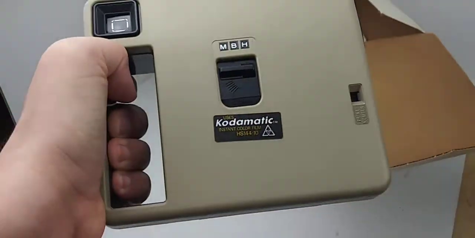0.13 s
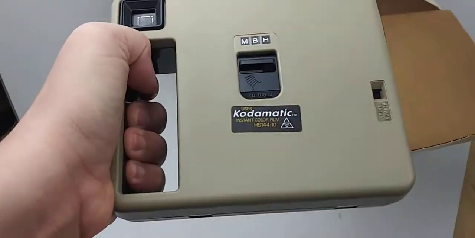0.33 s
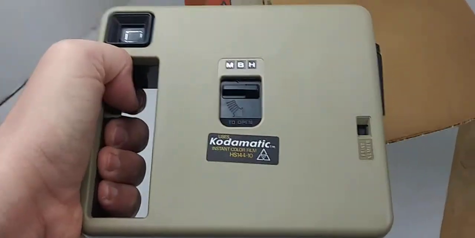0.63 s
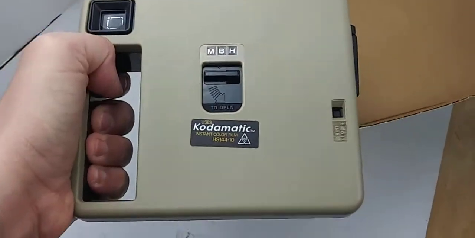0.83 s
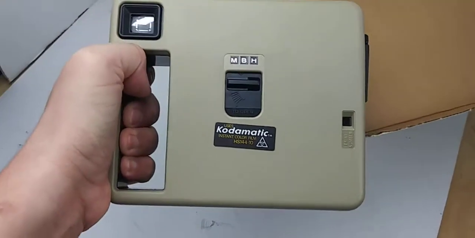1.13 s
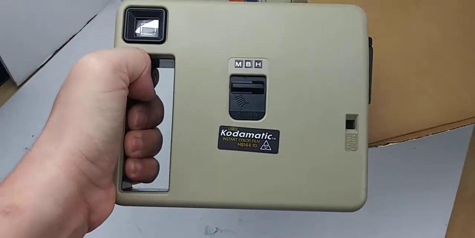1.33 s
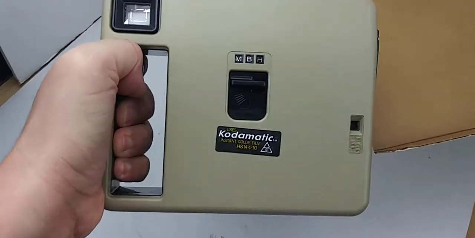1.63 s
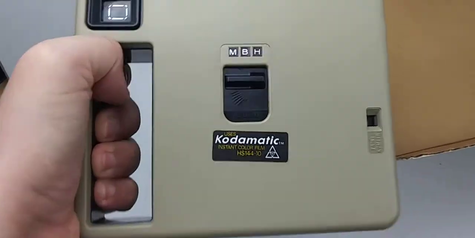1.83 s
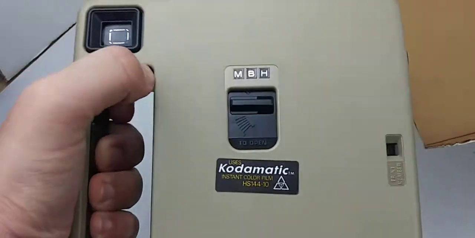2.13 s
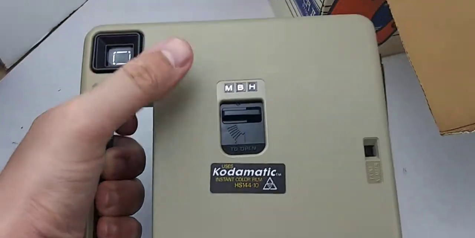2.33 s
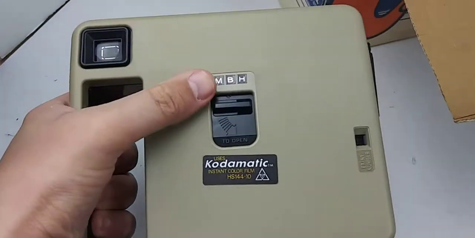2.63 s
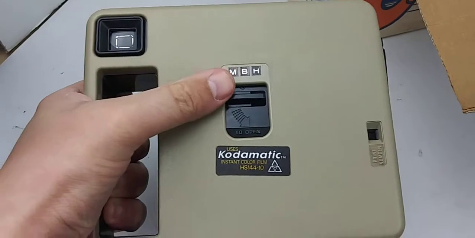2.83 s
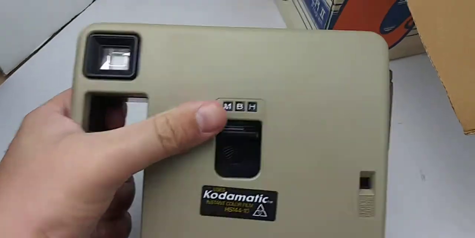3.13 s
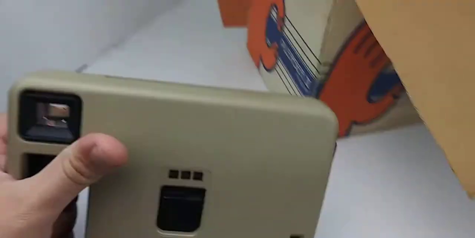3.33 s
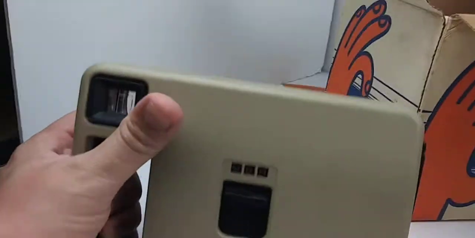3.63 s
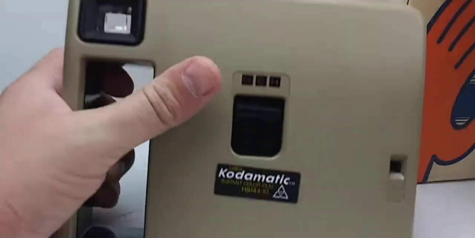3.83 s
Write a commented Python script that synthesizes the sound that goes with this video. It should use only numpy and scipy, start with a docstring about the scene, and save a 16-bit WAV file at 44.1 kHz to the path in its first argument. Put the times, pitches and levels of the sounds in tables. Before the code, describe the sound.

A hand handles a hollow plastic camera with light taps, rattles and a scraping slide.

```python
"""Handling a plastic camera

A hand shifts its grip on a hollow plastic camera close to the microphone in a quiet room.
Finger taps and rattling loose parts ring the shell; skin rubs, a finger squeaks, a catch snaps.
The camera bumps the table and slides with a gritty rush. A low hum wavers far away."""
import sys
import numpy as np
from scipy import signal
from scipy.fft import rfft, irfft
from scipy.io import wavfile
from scipy.ndimage import uniform_filter1d

SR = 44100
rng = np.random.default_rng(int(sys.argv[2]) if len(sys.argv) > 2 else 0)


def put_to_file(sound):
    """Save the sound as 16-bit audio at rate SR, in the file named by the first command-line argument."""
    columns = np.atleast_2d(sound).T  # one column per channel
    safe = np.clip(columns, -1, 1)
    whole_steps = np.round(safe * 32767)
    wavfile.write(sys.argv[1], SR, whole_steps.astype(np.int16))


N = 176400

# room hiss spectrum (frequency [Hz], density [dB])
AIR_SPECTRUM = [(25, -51), (61, -5.5), (107, -12.5), (228, -5), (571, -11.5), (856, -15), (1090, -16.5),
                (2080, -17), (3210, -20), (15800, -21.5)]
# room hiss, with brief dips (time [s], level [dB])
AIR_LEVELS = [(0, -63.5), (1.04, -65.5), (1.06, -78), (1.08, -66.5), (1.33, -68), (1.35, -77), (1.37, -64),
              (1.41, -69), (1.43, -80), (1.48, -75), (1.5, -68), (1.72, -66), (1.85, -64.5), (4, -61)]
WHISTLE_HZ, WHISTLE_START_DB = 3210, -80
# distant hum (time [s], pitch [Hz], level [dB])
HUM_TRACK = [(0, 98.2, -74.5), (.3, 101.1, -70), (.7, 105, -63.5), (.95, 103, -68.5), (1.05, 95, -79),
             (1.15, 91.7, -67), (1.35, 93.2, -75.5), (1.44, 91.7, -86), (1.55, 97.3, -72),
             (1.85, 95, -74.5), (2.2, 104.3, -68.5), (2.5, 100.9, -67.5), (2.75, 86.5, -68.5),
             (3.0, 79.7, -68), (3.25, 87, -69), (3.4, 90.1, -70), (4, 86.9, -72.5)]
HUM_OCTAVE_DB, HUM_WAVER_DB, HUM_WAVER_HZ = -19, 3, 4

# bumps through the table (time [s], level [dB], pitch [Hz], hard edge [dB], after-ring [dB])
TABLE_BUMPS = [(0.06, -37.5, 163, -17, -33), (0.333, -45, 200, -18, -16), (0.658, -41, 125, -17, -30),
               (0.966, -47.5, 203, -21, -13.5), (1.515, -41.5, 192, -14, -23),
               (1.604, -44.5, 268, -10, -10.5), (3.055, -30.5, 199.3, -5, -35), (3.264, -42.5, 266, -1, -9),
               (3.391, -37.5, 128, -4, -36), (3.6852, -10.5, 208, -17, -20), (3.9, -55, 267, -14, 15.5),
               (3.949, -49.5, 274, -19.5, 15)]
BUMP_WIDTH_CYCLES, BUMP_RING_T60_S, BUMP_EDGE_HZ = 0.23, 0.12, 910

# shell modes (frequency [Hz], level [dB], T60 [s])
SHELL_MODES = [(203, 8, 0.036), (261, 9.5, 0.093), (319, 15, 0.028), (429.4, 8, 0.09), (643, 3.5, 0.027),
               (947, -1.5, 0.047), (1272, 10, 0.009), (1647, 5, 0.021), (2050, 16.5, 0.0042),
               (2550, 19.5, 0.0027), (3640, 22, .006), (4330, 20, .006), (4900, 27, 0.00099),
               (6530, 25, 0.0018), (7150, 17, 0.006), (10200, 13, 0.0057)]
GRIP_DETUNE, TREBLE_MAX_T60_S = 0.05, 0.005  # the hand shifts the modes and damps the high ones
COLOUR_WIDTH_OCT, COLOUR_FLOOR_DB = 0.65, -10.5
PANEL_DB, PANEL_T60_S = 9, 0.05
# taps and rattles (time [s], level [dB], colour centre [Hz], bass [dB], treble [dB], chatter T60 [s])
SHELL_TAPS = [(0.226, -44, 1980, -33, -2, 0.054), (0.4, -38.5, 1266, -19.5, -48, 0.071),
              (0.429, -51.5, 4300, -14, 12, 0.14), (0.565, -47.5, 910, -7.5, -35, 0.06),
              (1.158, -52, 2150, -25, 13, 0.069), (1.361, -51, 1220, -3, -15, 0.08),
              (1.533, -51, 1160, 0, 8, 0.067), (1.568, -49, 1654, -2, -31, 0.086),
              (1.938, -37.5, 1516, -37, -17, 0.12), (2.061, -40, 2090, -14, -34, 0.14),
              (2.071, -35.5, 4470, -20, 11.5, 0.14), (2.163, -29.5, 1320, -17.5, -13, 0.051),
              (2.39, -41.5, 1647, -14, -3, 0.063), (2.514, -48, 1647, -15, -6, 0.18),
              (2.57, -30.5, 1320, -15, -10, 0.11), (2.626, -36, 4330, -10, 0.5, 0.1),
              (2.646, -29.5, 1326, -19.5, -19, 0.075), (2.716, -37, 1687, -8.5, -2.5, 0.11),
              (2.778, -38.5, 2100, -8, -8, 0.079), (2.838, -41.5, 1637, -13, -7, 0.08),
              (2.909, -32.5, 958, -13.5, -8.5, 0.089), (3.112, -36.5, 1273, -48, -9, 0.063),
              (3.148, -36.5, 4380, -12, 5, 0.075), (3.424, -31, 4330, -19, -2, 0.051),
              (3.452, -23, 2290, -5, -18, 0.037), (3.4705, -17, 3240, -11.5, -2, 0.048),
              (3.482, -16.5, 2630, -13, -5.5, 0.073), (3.511, -19.5, 1130, -8.5, -9, 0.11),
              (3.5975, -21.5, 3040, -2.5, -3, 0.043), (3.633, -29, 1130, -13, -30, 0.046),
              (3.683, -24, 1000, -2, 1, 0.069), (3.707, -23, 1200, -4, -12, 0.028),
              (3.946, -29.5, 1272, -28, -15, 0.086)]
CHATTER_PER_S, CHATTER_RISE_S, TREBLE_T60_RATIO = 1800, 0.0012, 0.87
FIRST_CLICK_DB, TAP_CREST_DB = 2.5, 10

# skin and shell rubbing (time [s], body level [dB], treble re body [dB])
RUB_LEVELS = [(0.4, -82, 10), (0.47, -67.5, -1), (0.62, -67.5, 1.5), (0.8, -76, 5), (0.95, -94, 2),
              (1.75, -83, 8.5), (1.899, -73, 10.5), (2.0, -68.5, 3.5), (2.2, -61.5, -9.5),
              (2.451, -64, -11), (2.55, -76, -20), (2.749, -61, -30), (2.88, -70.5, -17),
              (2.948, -54.5, -8), (3.0, -94, -29), (3.059, -73, -14), (3.1, -62, -19), (3.181, -77, 7),
              (3.235, -51, 0.5), (3.27, -69, -4), (3.34, -62, -34), (3.369, -78, 5), (3.44, -65, 6),
              (3.475, -31.5, -16), (3.559, -50.5, -2), (3.66, -44.5, -5), (3.719, -40.5, -2),
              (3.81, -42.5, 4.5), (3.87, -42.5, 2), (3.93, -42, -3), (4, -45, 1)]
# rubbing spectrum (frequency [Hz], density [dB])
RUB_SPECTRUM = [(60, -12), (200, -2.5), (400, -1), (700, -6.5), (1100, 3), (4400, -0.5), (5400, -9.5),
                (6900, -3), (9000, -13), (12500, -9), (15800, -25)]
GRIT_PER_S, GRIT_SPREAD_DB, RUB_FLICKER_DB = 11000, 1, 1.65

# snaps of the catch (time [s], level [dB], ring [dB], tick [dB])
CATCH_SNAPS = [(1.1347, -31, -1.5, -9.5), (3.629, -19.5, -17, 0)]
# catch modes (frequency [Hz], level [dB], T60 [s])
CATCH_MODES = [(1967, 1.5, 0.032), (2090, 4.5, 0.023), (2150, -6, 0.03), (2660, -20, 0.0068),
               (3650, -8, 0.028), (6060, -23, 0.01), (6950, -16, .012)]

# finger slipping off the grip (time [s], level [dB])
SQUEAK_LEVELS = [(2.085, -52.5), (2.12, -47), (2.15, -36), (2.17, -46), (2.2, -66)]
SLIPS_PER_S, SQUEAK_HZ = 700, 1138

ROOM_T60_S, ROOM_DB, BAND_LIMIT_HZ = 0.27, -17, 15900


def amp(db):
    return 10 ** (np.asarray(db) / 20)


def unit_rms(x):
    return x / np.sqrt(np.mean(x ** 2) + 1e-20)


def butter(x, order, hz, kind):
    return signal.sosfilt(signal.butter(order, hz, kind, fs=SR, output="sos"), x)


def curve(rows, column):
    """Table column interpolated over the scene."""
    rows = np.array(rows)
    return np.interp(np.arange(N) / SR, rows[:, 0], rows[:, column])


def coloured(x, spectrum):
    """x filtered by a (frequency [Hz], gain [dB]) table."""
    knots_hz, knots_db = np.transpose(spectrum)
    hz = np.fft.rfftfreq(len(x), 1 / SR)
    gain_db = np.interp(np.log(hz + 1), np.log(knots_hz + 1), knots_db)
    return irfft(rfft(x) * amp(gain_db), len(x))


def modes(rows, t, phase=0):
    """Sum of decaying sines."""
    return sum(amp(db - 60 * t / t60_s) * np.sin(2 * np.pi * hz * t + phase) for hz, db, t60_s in rows)


def drift():
    """Slow random curve, unit rms."""
    return unit_rms(uniform_filter1d(uniform_filter1d(rng.standard_normal(N), 1500), 1500))


def clicks(per_s, size=N):
    """Random impulses of either sign, a few larger."""
    hits = rng.random(size) < per_s / SR
    sign = rng.choice([-1., 1.], size)
    return hits * sign * amp(GRIT_SPREAD_DB * np.minimum(rng.exponential(1, size), 4))


def room_air():
    """Soft hiss and a faint whistle on one level curve."""
    hiss = unit_rms(coloured(rng.standard_normal(N), AIR_SPECTRUM))
    whistle = np.sin(2 * np.pi * WHISTLE_HZ * np.arange(N) / SR)
    return amp(curve(AIR_LEVELS, 1)) * (hiss + amp(WHISTLE_START_DB - AIR_LEVELS[0][1]) * whistle)


def distant_hum():
    """Low wavering tone with a faint octave."""
    pitch_hz = curve(HUM_TRACK, 1) + HUM_WAVER_HZ * drift()
    level_db = curve(HUM_TRACK, 2) + HUM_WAVER_DB * drift()
    phase = 2 * np.pi * np.cumsum(pitch_hz) / SR
    return np.sqrt(2) * amp(level_db) * (np.sin(phase) + amp(HUM_OCTAVE_DB) * np.sin(2 * phase))


def table_bump(db, hz, edge_db, ring_db):
    """Short low push through the table, with a hard edge and an after-ring."""
    t = np.arange(8000) / SR
    push = np.sin(2 * np.pi * hz * t) * np.exp(-(t * hz / BUMP_WIDTH_CYCLES) ** 2)
    ring = modes([(BUMP_EDGE_HZ, edge_db, 0.006), (hz, ring_db, BUMP_RING_T60_S)], t)
    return amp(db) * (push + ring)


def shell_response(centre_hz, bass_db, treble_db):
    """Shell impulse response as (body, treble); the struck panel rings at the colour centre."""
    t = np.arange(4096) / SR
    bands = np.zeros((2, len(t)))
    for (hz, db, t60_s), shift in zip(SHELL_MODES, rng.uniform(-1, 1, len(SHELL_MODES))):
        high = hz > 3000
        floor = amp(COLOUR_FLOOR_DB + min(treble_db, 0) * high)
        bell = np.exp(-0.5 * (np.log2(hz / centre_hz) / COLOUR_WIDTH_OCT) ** 2)
        weight = amp(bass_db) if hz < 500 else amp(treble_db) if hz > 4800 else floor + bell
        mode = (hz * (1 + GRIP_DETUNE * shift), db, min(t60_s, TREBLE_MAX_T60_S) if high else t60_s)
        bands[int(high)] += weight * modes([mode], t, phase=np.pi * (shift > 0))
    bands[0] += modes([(centre_hz, PANEL_DB, PANEL_T60_S)], t)
    return bands


def shell_tap(db, centre_hz, bass_db, treble_db, t60_s):
    """A first click and a dying chatter of micro-bounces ring the shell."""
    t = np.arange(9000) / SR
    chatter = clicks(CHATTER_PER_S, len(t)) * np.minimum(t / CHATTER_RISE_S, 1)
    chatter[0] = amp(FIRST_CLICK_DB)
    band_t60_s = t60_s * np.array([[1], [TREBLE_T60_RATIO]])
    drive = chatter * amp(-60 * t / band_t60_s)
    response = shell_response(centre_hz, bass_db, treble_db)
    ring = signal.fftconvolve(drive, response, axes=1).sum(0)[:len(t)]
    onset_rms = np.sqrt(np.mean(ring[:350] ** 2))
    return amp(db - TAP_CREST_DB) * ring / onset_rms


def rubbing():
    """Dense grit under the sliding hand and shell, flickering with pressure."""
    grit = rfft(coloured(clicks(GRIT_PER_S), RUB_SPECTRUM))
    hz = np.fft.rfftfreq(N, 1 / SR)
    highpass = 1 / (1 + (4600 / (hz + 1)) ** 8)
    body = unit_rms(irfft(grit * (1 - highpass), N))
    treble = unit_rms(irfft(grit * highpass, N))
    flicker_db = RUB_FLICKER_DB * unit_rms(uniform_filter1d(rng.standard_normal(N), 400))
    return amp(curve(RUB_LEVELS, 1) + flicker_db) * (body + amp(curve(RUB_LEVELS, 2)) * treble)


def catch_snap(db, ring_db, tick_db, rise_s=0.00072, tick_t60_s=0.0083):
    """A small catch snaps: broadband tick plus its ringing modes."""
    t = np.arange(4000) / SR
    impact = rng.standard_normal(len(t)) + 5 * (t == 0)
    tick = uniform_filter1d(np.diff(impact, prepend=0), size=3)
    ring = modes(CATCH_MODES, t) * np.minimum(t / rise_s, 1)
    return amp(db) * (amp(ring_db - 7) * ring + amp(tick_db - 60 * t / tick_t60_s) * tick)


def finger_squeak():
    """Uneven slips of a finger ring the shell."""
    slips = clicks(SLIPS_PER_S)
    response = shell_response(SQUEAK_HZ, bass_db=-1, treble_db=-11).sum(0)
    ring = butter(signal.oaconvolve(slips, response)[:N], 4, 300, "high")
    faded = [(SQUEAK_LEVELS[0][0] - 0.01, -110), *SQUEAK_LEVELS, (SQUEAK_LEVELS[-1][0] + 0.05, -110)]
    return unit_rms(ring) * amp(curve(faded, 1))


def room_reverb(x):
    """Short tail of sparse reflections, starting after 4 ms."""
    t = np.arange(SR // 2) / SR
    reflections = rng.choice([-1., 1.], len(t)) * (rng.random(len(t)) < 0.06)
    tail = reflections * amp(-60 * t / ROOM_T60_S) * (t > 0.004)
    return amp(ROOM_DB) * signal.fftconvolve(x, tail / np.linalg.norm(tail))[:N]


def scene():
    """Close handling and its reverb over hiss and hum, mono."""
    background = room_air() + distant_hum()
    handling = rubbing() + finger_squeak()
    for events, source in ((SHELL_TAPS, shell_tap), (TABLE_BUMPS, table_bump), (CATCH_SNAPS, catch_snap)):
        for time_s, *settings in events:
            sound = source(*settings)
            start = round(time_s * SR)
            handling[start:start + len(sound)] += sound[:N - start]
    handling = butter(handling, 3, 110, "high")
    return (background + handling + room_reverb(handling))[None]


def record(dry):
    """Microphone loses deep bass and the top octave; then a band limit."""
    x = butter(dry, 2, 60, "high")
    shelved = butter(x, 4, 7900, "low") + amp(-19.5) * x
    band_limit = signal.firwin(511, BAND_LIMIT_HZ, window=("kaiser", 9), fs=SR)
    return signal.oaconvolve(shelved, band_limit[None], "same")


dry = scene()
out = record(dry)
put_to_file(out)
```